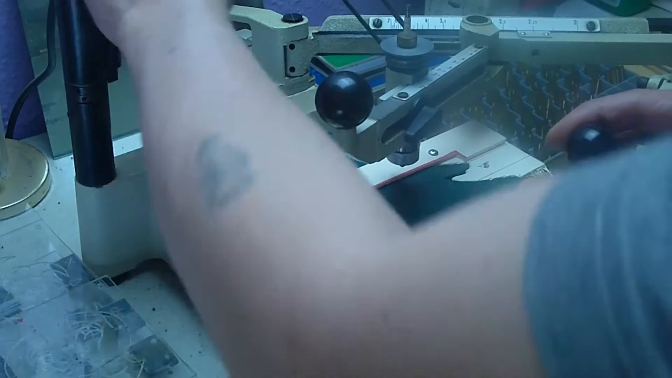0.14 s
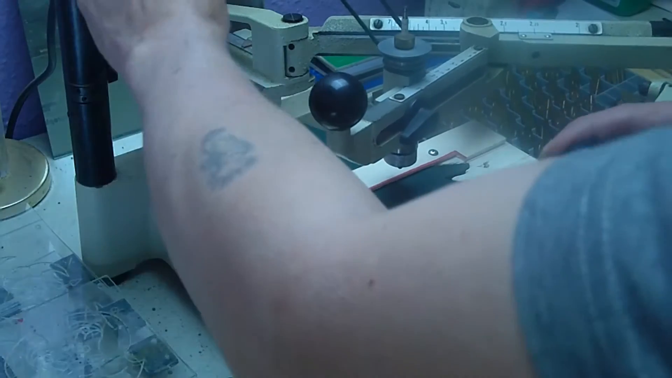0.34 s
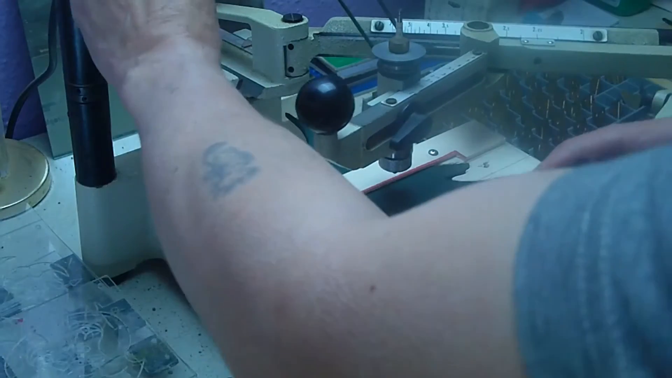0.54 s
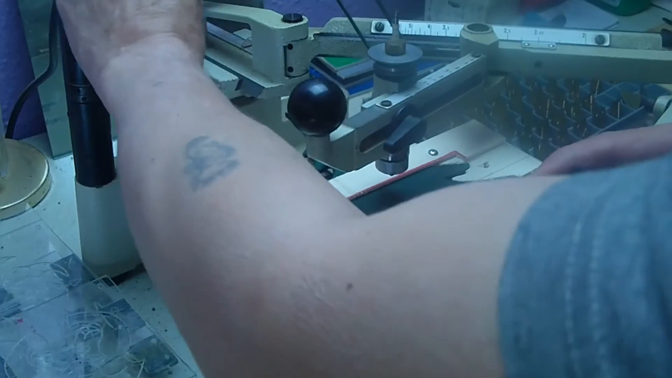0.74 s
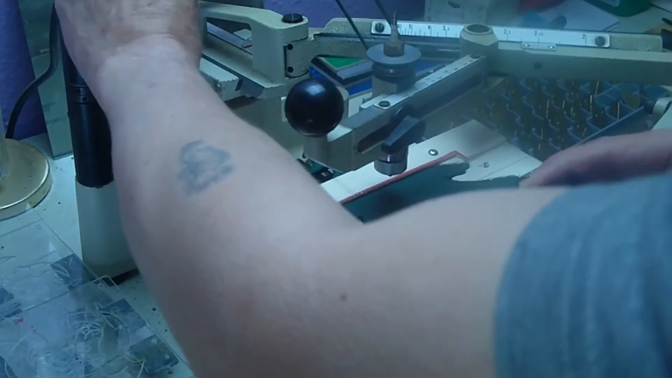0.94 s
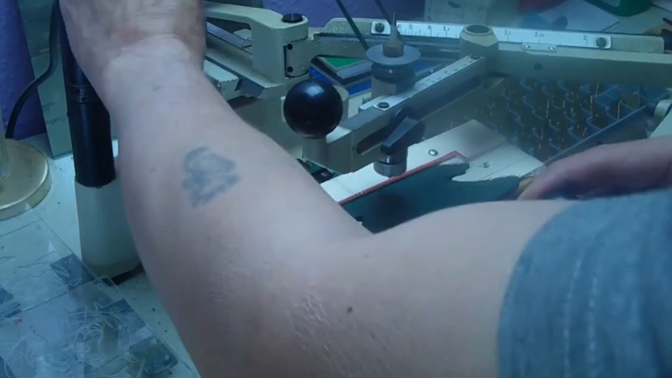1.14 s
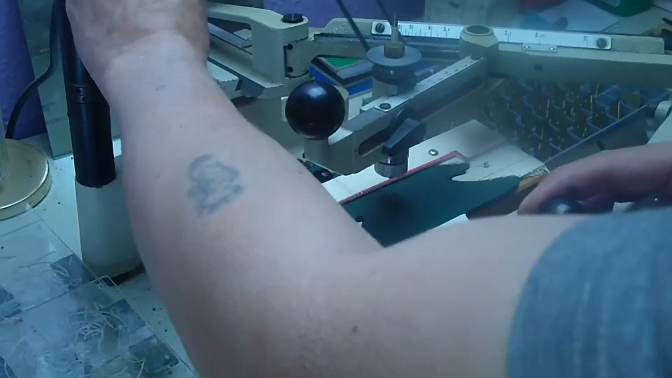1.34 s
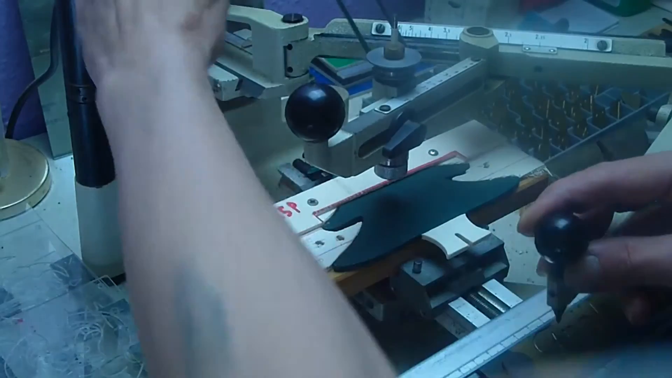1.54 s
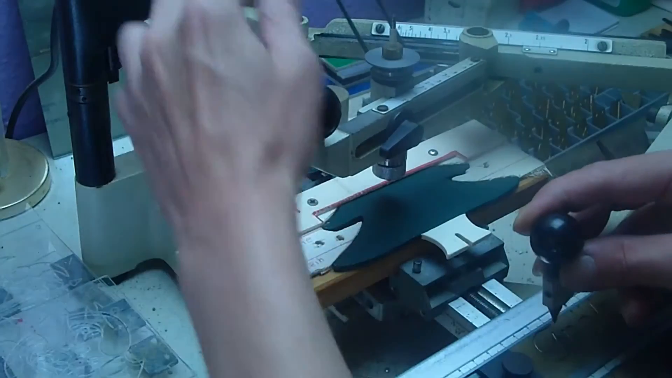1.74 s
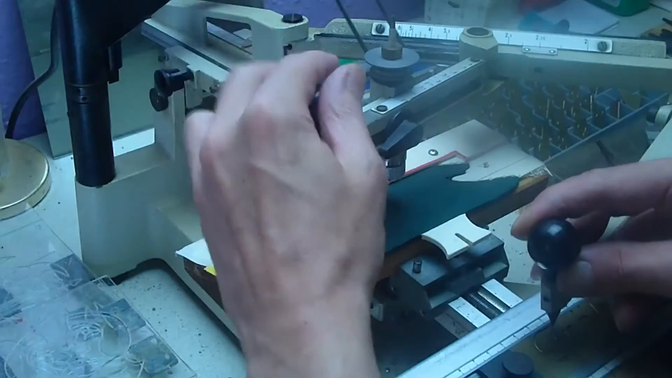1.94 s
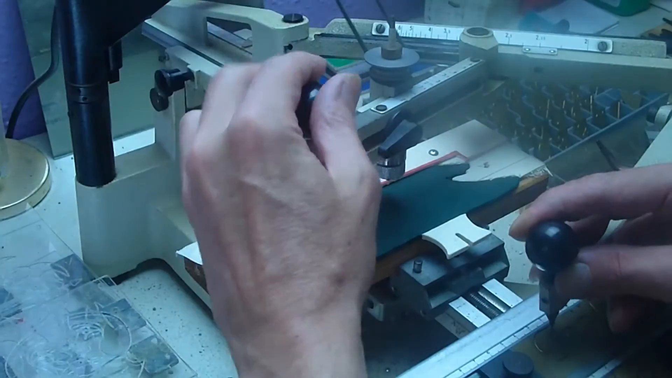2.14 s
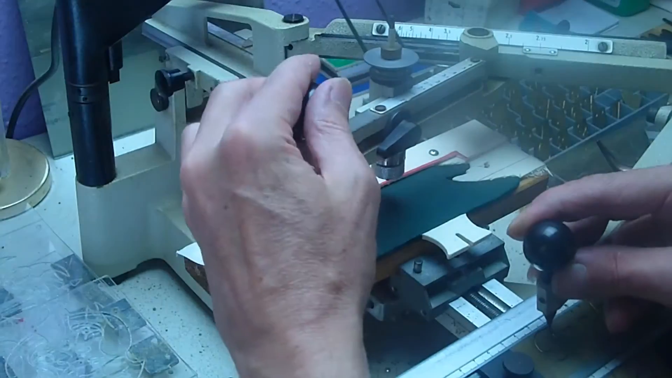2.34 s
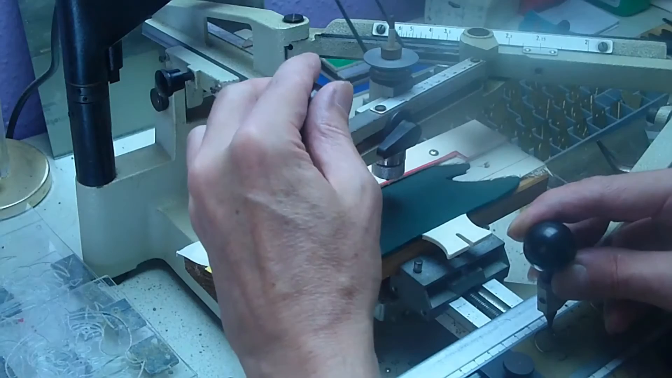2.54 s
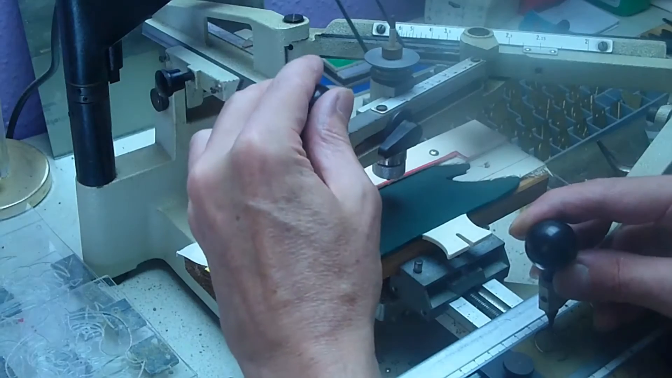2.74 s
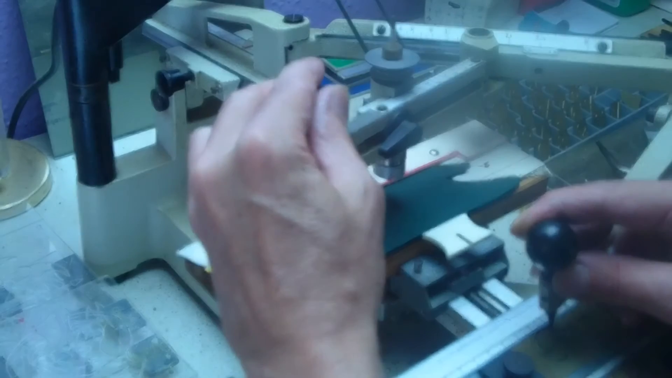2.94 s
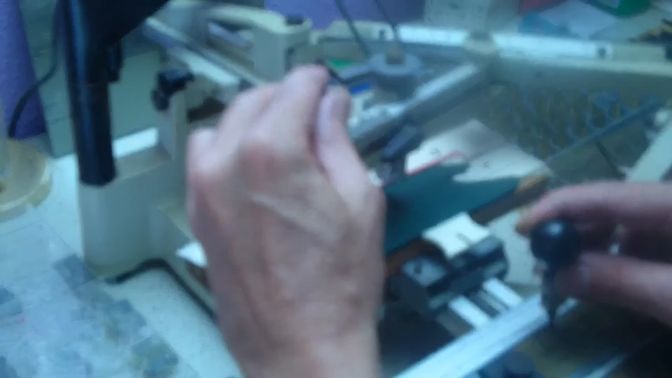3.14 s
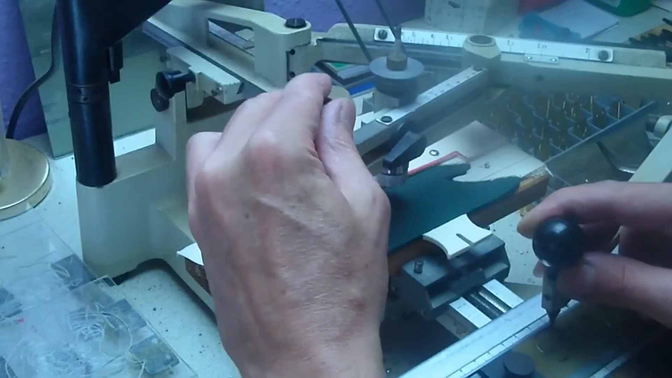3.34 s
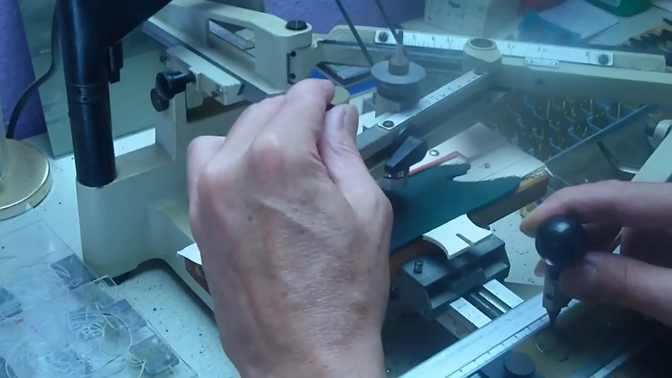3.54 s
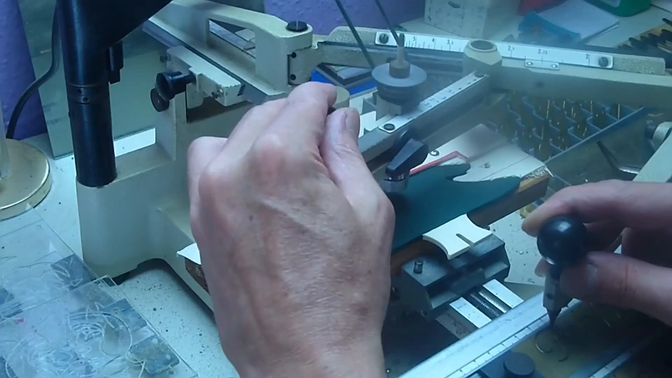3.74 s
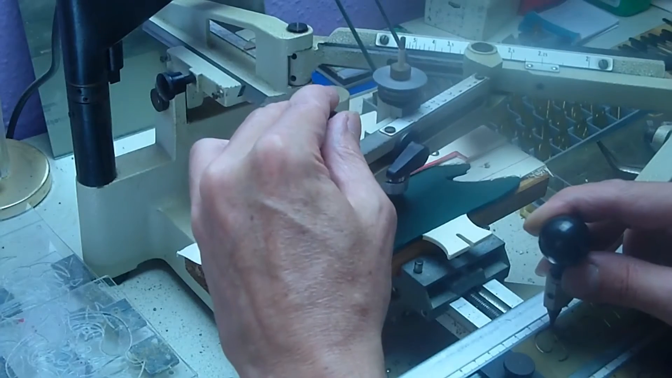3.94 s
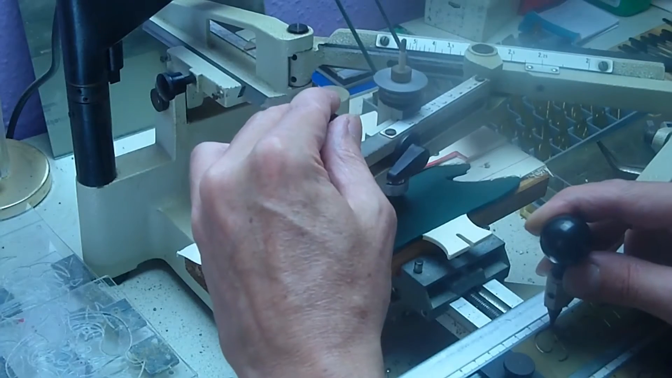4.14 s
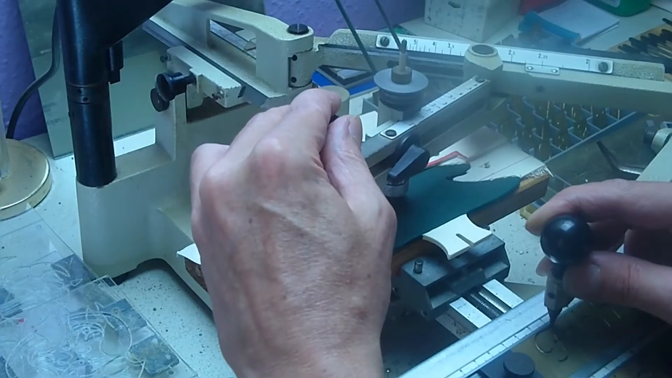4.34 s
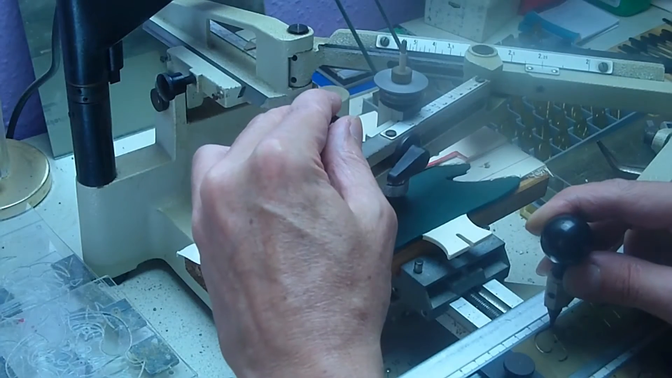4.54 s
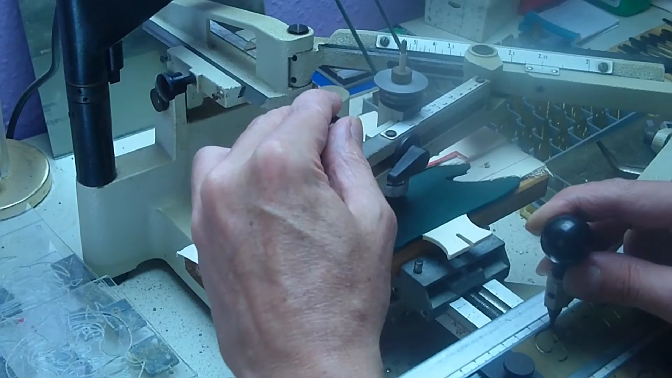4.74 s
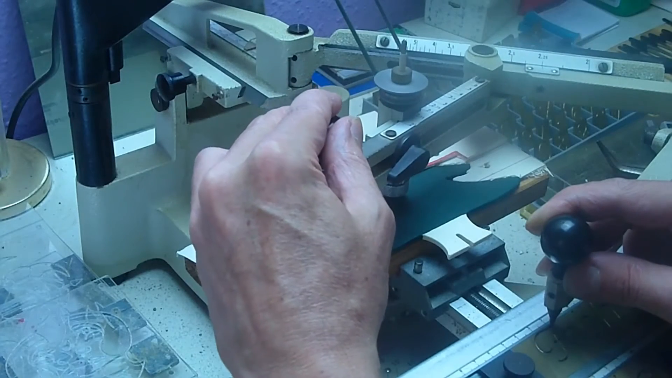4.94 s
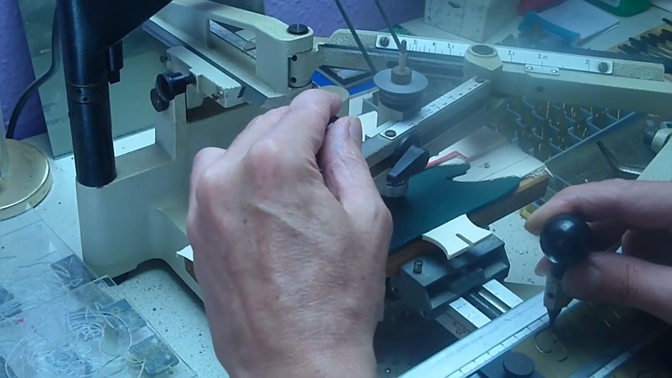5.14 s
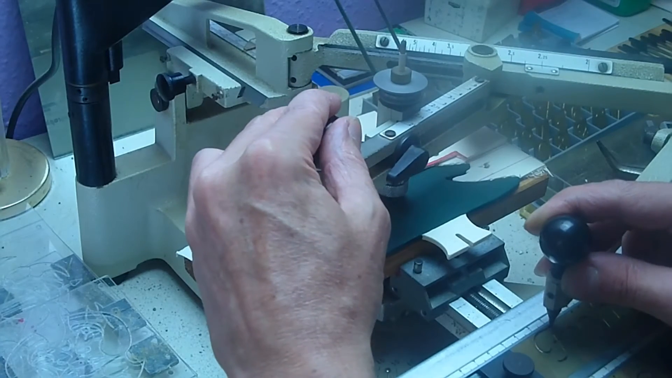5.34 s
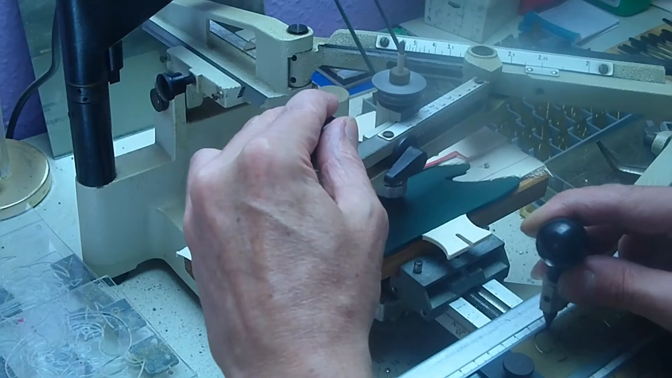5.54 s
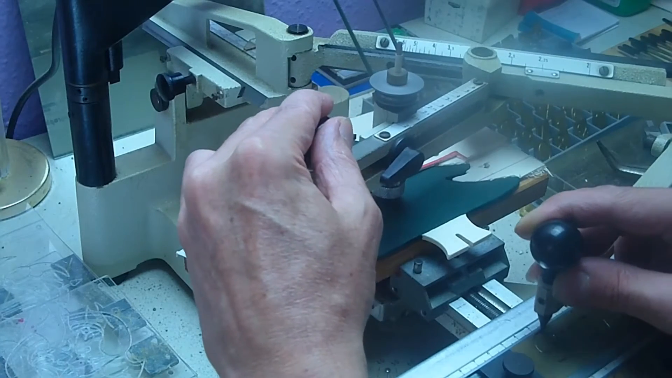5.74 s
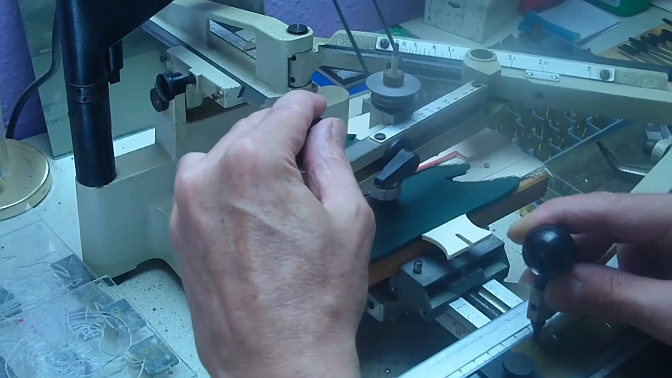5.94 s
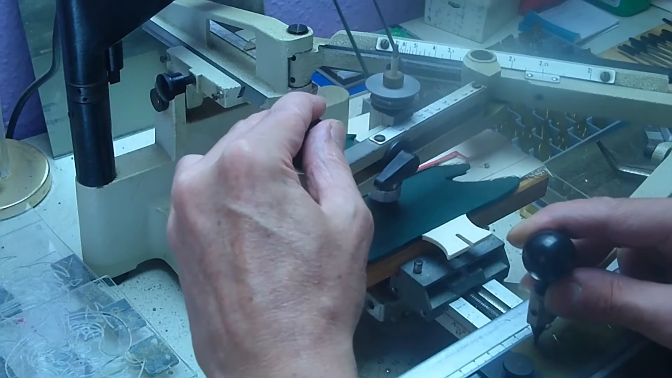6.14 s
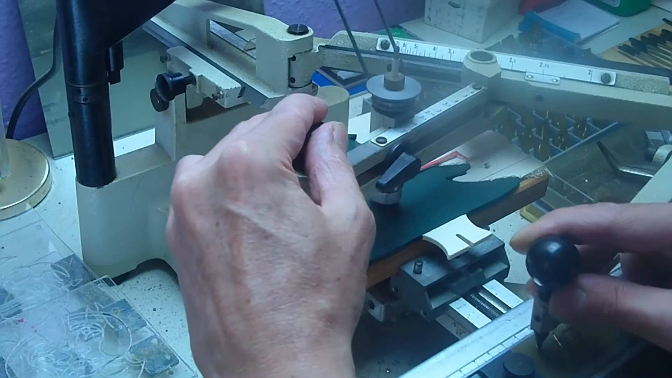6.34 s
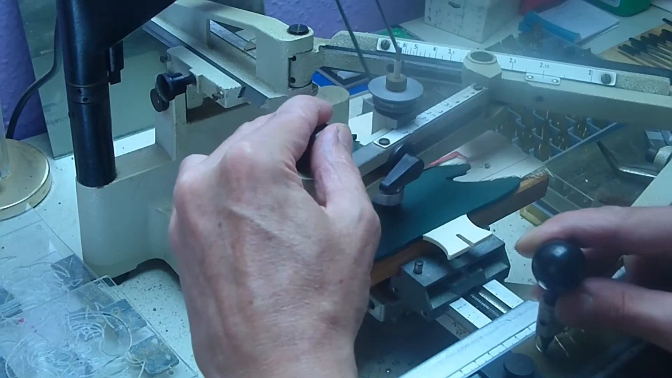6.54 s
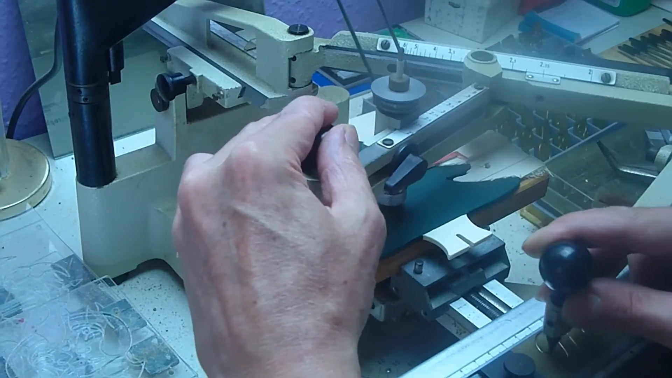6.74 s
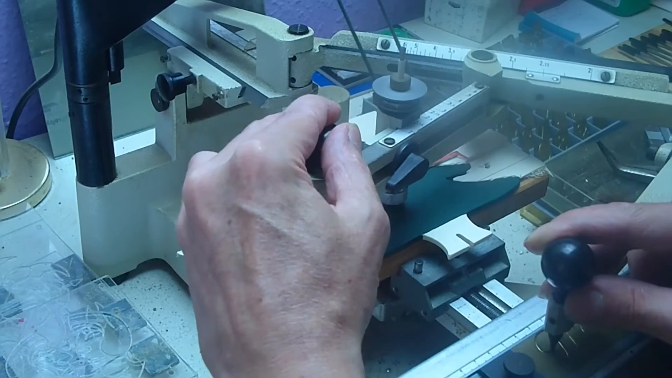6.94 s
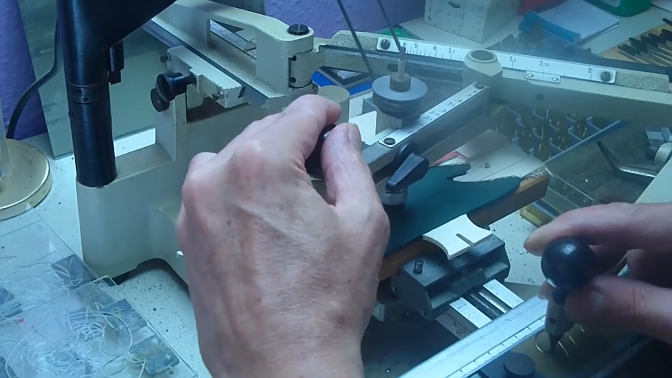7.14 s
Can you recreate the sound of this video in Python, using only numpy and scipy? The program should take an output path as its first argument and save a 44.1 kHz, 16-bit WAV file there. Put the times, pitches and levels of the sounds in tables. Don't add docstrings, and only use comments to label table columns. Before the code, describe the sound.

Quiet workshop hum, finger taps and a sharp switch click; a brushed motor and belt-driven spindle spin up, then whir and chatter harshly in wood.

```python
import sys
import numpy as np
from scipy import signal
from scipy.fft import rfft, irfft, next_fast_len
from scipy.io import wavfile

SR = 44100
rng = np.random.default_rng(int(sys.argv[2]) if len(sys.argv) > 2 else 0)


def persist_wave(psi):
    counts = np.round(np.clip(psi, -1, 1) * 32767).astype(np.int16)
    wavfile.write(sys.argv[1], SR, np.atleast_2d(counts).T)


def amplitude_ratio(level_db):
    exponent = np.asarray(level_db, float) / 20
    return 10 ** exponent


N = 317520
TIME = np.arange(N) / SR
FREQ = np.arange(N // 2 + 1) * SR / N + 1

# f/Hz, width/Hz, level/dB
FRAME = [(718, 92, 11.5), (917, 46, 8), (1200, 56, 4.5), (2406, 76, 8.5), (2700, 164, 9), (2910, 140, 8),
         (4065, 110, 4.5), (4420, 220, 4), (5170, 99, 3.5), (5890, 110, 2), (6550, 170, -1),
         (8060, 300, 3.5), (9350, 380, 4.5)]
# f/Hz, width/Hz, level/dB
BENCH = [(186.4, 4.3, 17), (221.3, 9.1, 25), (236, 23, 21.5), (263, 14, 18.5), (285, 5.8, 8),
         (335, 16.5, 22), (512, 20, 15), (717, 27, 15), (845, 118, 21)]
# f/Hz, width/Hz, level/dB
HOUSING = [(1780, 270, 10.4), (2200, 59, 10), (2350, 48, 23), (2430, 65, 24.6), (2563, 34, 21),
           (2430, 200, 7.6)]


def on_log(table, hz):
    f, value = np.array(table)[:, 0], np.array(table)[:, 1]
    return np.interp(np.log(hz), np.log(f + 1), value)


def rise(start_s, length_s):
    return np.clip((TIME - start_s) / length_s, 0, 1)


def bursts(table):
    return sum(db * np.exp(-(2 * (TIME - s) / length) ** 2) for s, length, db in table)


def noise(gain):
    x = irfft(rfft(rng.standard_normal(N)) * gain, N)
    return x / np.std(x)


def walk(rate_hz):
    steps = TIME[::128]
    hz = np.arange(len(steps) // 2 + 1) / steps[-1]
    x = irfft(rfft(rng.standard_normal(len(steps))) / (1 + (hz / rate_hz) ** 2), len(steps))
    return np.interp(TIME, steps, x / np.std(x))


def ring(s, hz, t60):
    age = np.clip(TIME[int(s * SR):int((s + .3) * SR)] - s, 0, 1)
    return np.sin(2 * np.pi * hz * age) * np.exp(-np.log(1000) * age / t60)


def add(out, s, x):
    start = int(s * SR)
    out[start:start + len(x)] += x


def tone(angle, db, flutter_db):
    level = np.interp(TIME, TIME[::128], amplitude_ratio((db + flutter_db * walk(11.8))[::128]))
    return np.sqrt(2) * level * np.sin(angle + 2 * np.pi * rng.random())


def mains_hum():
    # f/Hz, level/dB
    hum_tones = [(50.2, -35), (147.4, -48), (249, -56), (365, -64), (450, -75), (102, -76), (291, -62),
                 (579, -61), (1174, -74.5), (1798, -82), (3596, -77), (5394, -76)]
    hum = sum(tone(2 * np.pi * hz * TIME, db, flutter_db=min(hz / 300, 1.3)) for hz, db in hum_tones)
    return hum * amplitude_ratio(3.5 * rise(1.13, 0.039))


def room_noise():
    # f/Hz, level/dB (per Hz)
    shop = [(30, -2.5), (70, -17), (120, -11), (300, -17), (600, -22), (1100, -29), (2000, -32.5),
            (4300, -31), (5600, -37), (6500, -44), (9000, -49), (10500, -52), (11500, -80)]
    return amplitude_ratio(-52.5 + 1.2 * walk(9.9)) * noise(amplitude_ratio(on_log(shop, FREQ)))


def camera_drive():
    drive = np.zeros(N)
    soft = np.sin(np.pi / 2 * np.clip(np.arange(800) / 40, 0, 1)) ** 2
    for s in np.arange(.009, 7.17, 1 / 29.97):
        add(drive, s, soft * ring(s, 5000, .011)[:800])
        add(drive, s + .0086, 1.2 * soft * ring(s, 5000, 0.012)[:800])
    return drive + 0.094 * noise(1 / (1 + ((FREQ - 5000) / 250) ** 2))


def switch_ticks():
    # t/s, peak level/dB, dullness (0 to 1)
    ticks = [
        (0.4722, -57, 0.3),
        (0.6015, -40, 0.6),
        (0.621, -45, 0.7),
        (0.9137, -48, 0.5),
        (1.0888, -43, 0.3),
        (1.0944, -45, 0.3),
        (1.1268, -31, 0.3),
        (1.1288, -15, 0),
        (1.148, -27, 0.5),
    ]
    # f/Hz, level/dB, t60/s
    switch_modes = [(2800, -3, 0.028), (3560, 1, 0.029), (3930, -2, 0.052), (4140, 8.5, 0.026),
                    (4630, -17, 0.063), (5400, 9, 0.048), (7612, -27, 0.065), (8700, -25, 0.049)]
    out = np.zeros(N)
    crack_band = signal.butter(5, [1000, 6200], "bandpass", fs=SR)
    age = np.arange(2000) / SR
    crack_shape = (1 - np.exp(-age / 0.0006)) * np.exp(-age / 0.005)
    for s, db, dull in ticks:
        ringing = 0
        for f, mode_db, t60 in switch_modes:
            level_luck, pitch_luck = rng.standard_normal(2)
            level_db = mode_db + 3.3 * level_luck - 32 * dull * np.log2(f / 4000)
            ringing = ringing + amplitude_ratio(level_db) * ring(s, f * (1 + .02 * pitch_luck), min(t60, .025))
        crack = signal.lfilter(*crack_band, rng.standard_normal(len(age))) * crack_shape
        faint = db < -30
        add(out, s, amplitude_ratio(db - 9 - 9 * faint) * ringing)
        add(out, s, amplitude_ratio(db - 0.5 + 3 * faint) * crack)
    return out


def lever_creaks():
    # t/s, level/dB
    creaks = [(.729, -60), (.752, -55), (.787, -55), (.855, -53), (.918, -52), (.957, -54), (.99, -53),
              (1.019, -51), (1.054, -55)]
    out = np.zeros(N)
    for s, db in creaks:
        add(out, s, amplitude_ratio(db) * (ring(s, 2140, 0.027) + 1.2 * ring(s, 980, .04)))
    return out


def bench_thuds():
    # t/s, level/dB, f/Hz, t60/s
    thuds = [(1.131, -28, 111, 0.14), (1.156, -19.5, 122, 0.082), (1.159, -26.5, 255, 0.14),
             (1.311, -18, 144, .1), (1.52, -26, 131, .15), (1.75, -34, 118, 0.26), (1.899, -30, 124.5, .15),
             (2.12, -27, 127, 0.3), (2.2, -28, 63, .2), (2.269, -24, 137, .1), (2.48, -26, 109, 0.092)]
    out = np.zeros(N)
    for s, db, hz, t60 in thuds:
        thud = ring(s, hz, t60)
        push = np.clip(np.arange(len(thud)) / (0.012 * SR), 0, 1)
        add(out, s, amplitude_ratio(db + 3.5) * thud * push)
    return out


def turns(hz):
    return 2 * np.pi * np.cumsum(hz * (1 + .0003 * walk(5.9))) / SR


def frame_gain(hz, modes):
    return 1 + sum((amplitude_ratio(db) - 1) / (1 + (2 * (hz - f) / width) ** 2) for f, width, db in modes)


def low_order(k, hz, angle, db, flutter_db, modes):
    # f/Hz, width/Hz
    nulls = [(191, 2), (203.5, 2), (243, 5), (290, 6), (306, 3), (312, 1.5)]
    slow = k * hz[::256]
    gain = frame_gain(slow, modes) / (1 + (slow / 9350) ** 16)
    for f, width in nulls:
        gain = gain * (1 - 0.96 / (1 + (2 * (slow - f) / width) ** 2))
    return np.interp(TIME, TIME[::256], gain) * tone(k * angle, db, flutter_db)


def fine_orders(table, hz, angle, db):
    slow = hz[::256]
    out = 0
    for k, level in table:
        gain = frame_gain(k * slow, FRAME) / frame_gain(k * slow[-1], FRAME)
        out = out + np.repeat(gain, 256)[:N] * tone(k * angle, level + db, flutter_db=0.97)
    return out


def motor_tones(hz, angle, mains, speed_db, cut, slip, ending):
    # order, level/dB at full speed
    motor_orders = [(18, -49), (20, -48), (21, -36), (22, -41.5), (26, -29), (27, -36.5), (28, -33.5),
                    (33, -40), (34, -41), (36, -51), (38, -50)]
    # order, level/dB
    slot_orders = [(25, -44), (29, -45), (30, -48), (31, -48), (35, -47), (37, -53), (42, -52), (43, -49),
                   (46, -55), (47, -48), (48, -52), (55, -49), (60, -52)]
    # f/Hz, width/Hz, level/dB
    stator = [(5900, 160, 11), (7000, 200, 6), (7760, 300, 10), (8300, 300, 6), (8850, 300, 6),
              (9550, 500, 11)]
    # f/Hz, width/Hz, level/dB
    cap = [(2400, 150, 22), (2750, 170, 23), (2970, 230, 27), (3800, 310, 18), (4055, 77, 28),
           (4483, 110, 26)]
    cut_db = -11 + 11.0 * cut + 1.5 * speed_db
    current_db = 1.2 * slip - .35 * speed_db ** 2
    out = low_order(1, hz, angle, -43 + 1.5 * cut + 0.27 * speed_db, 1.7, BENCH)
    out += low_order(4, hz, angle, -46.5 + 6.5 * speed_db, 2.5, BENCH)
    out += tone(6 * angle, -36 + 5.1 * cut + 2.0 * speed_db, 1.0)
    out += low_order(12, hz, angle, -45 + 1.0 * speed_db + 3.5 * ending, 1.5, HOUSING)
    out += low_order(1, 12 * hz - 100, 12 * angle - mains, -54 - 5.5 * cut, 1.5, HOUSING)
    out += tone(12 * angle + mains, -32.5 + 0.27 * cut_db + 8.3 * speed_db, 1.5)
    out += low_order(24, hz, angle, -52 + 10.5 * cut + 0.83 * speed_db, 1.0, cap)
    for k, db in slot_orders:
        out += low_order(k, hz, angle, db + current_db, 3.5, stator)
    return out + fine_orders(motor_orders, hz, angle, cut_db)


def spindle_tones(hz, angle, speed_db, cut, slip):
    # order, level/dB at full speed
    spindle_orders = [(7, -36), (9, -41.5), (13, -40.5), (14, -37.5), (22, -48), (23, -42), (24, -43),
                      (25, -41.5), (26, -41), (27, -54), (29, -49.5), (31, -49)]
    # t/s, length/s, level/dB
    chatter_5 = [
        (2.45, .15, 10),
        (3.41, 0.11, 5),
        (4.5, 0.24, 8),
        (5.9, .75, 12),
        (6.75, 0.65, 6.5),
    ]
    # t/s, length/s, level/dB
    chatter_6 = [
        (4.42, .3, 15.6),
        (5.5, 0.22, 8.4),
        (6.08, 0.41, 9.1),
        (6.65, 0.31, 5),
    ]
    low = low_order(1, hz, angle, -38.5, 0.93, BENCH)
    low += low_order(2, hz, angle, -47 + 0.83 * cut, 1.0, BENCH)
    low += tone(5 * angle, -44 + 1.9 * speed_db + bursts(chatter_5), 1.0)
    low += low_order(6, hz, angle, -48 + 1.9 * cut + 3.0 * speed_db + bursts(chatter_6), 3.5, HOUSING)
    fine = fine_orders(spindle_orders, hz, angle, .3 - 12 * slip ** 3 + 1.4 * speed_db)
    return rise(1.38, 0.084) * low + fine


def frame_rattle(mains, speed_db):
    # f/Hz, level/dB (per Hz)
    rattle = [(40, -36), (90, -4.5), (130, -4.5), (250, -7.5), (450, 2), (700, -6.5), (1100, 0.5),
              (1600, -1), (2200, -6.5), (4000, -50)]
    level = amplitude_ratio(-25.5 + 2.43 * speed_db + 1.25 * walk(11))
    hiss = noise(frame_gain(FREQ, FRAME) * amplitude_ratio(on_log(rattle, FREQ)))
    return level * hiss * (1 + 0.082 * np.cos(mains))


def cover_ring():
    # t/s, length/s, level/dB
    shakes = [
        (1.24, 0.027, 5),
        (1.7, .15, 0.5),
        (2.3, 0.19, 3.5),
        (2.86, 0.89, 6.5),
        (4.2, 0.39, 4),
        (5.25, 0.42, 2.5),
        (7.13, 0.087, 0),
    ]
    ringing = noise(1 / (1 + (2 * (FREQ - 829.5) / 60) ** 2))
    return amplitude_ratio(-33.0 + bursts(shakes) + 0.85 * walk(14)) * ringing


def brush_hiss(motor, mains, speed_db, cut):
    # f/Hz, level/dB (per Hz)
    brush = [(600, -21), (1500, -17), (2000, -2.5), (3000, -2.5), (3700, -1.5), (4600, 0.5), (5600, 0.5),
             (6400, -0.5), (7500, -20), (12000, -39)]
    sparks = 1 + 0.15 * np.cos(2 * motor) + 0.086 * np.cos(motor) + 0.063 * np.cos(mains)
    level = amplitude_ratio(-24.0 + 1.27 * cut + 0.78 * speed_db + 0.87 * walk(17))
    return level * noise(frame_gain(FREQ, FRAME) * amplitude_ratio(on_log(brush, FREQ))) * sparks


def bearing_hiss(spindle, speed_db, slip, ending):
    # f/Hz, level/dB (per Hz)
    bearing = [(4000, -44), (6000, -1), (7000, 0), (8500, -3.5), (9600, -3.5), (10300, -6.5), (11200, -11),
               (12500, -22), (13800, -31), (15000, -59)]
    balls = 1 + 0.22 * np.cos(spindle) + 0.16 * np.cos(2 * spindle)
    level = amplitude_ratio(-30.5 + 1.17 * slip + 1.3 * speed_db - 3.9 * ending ** 3 + 0.24 * walk(19.0))
    return level * noise(frame_gain(FREQ, FRAME) * amplitude_ratio(on_log(bearing, FREQ))) * balls


def machine():
    # t/s, motor turns f/Hz
    speed = [(1.14, 59.7), (1.21, 71), (1.31, 99.6), (1.43, 126.3), (1.55, 144.6), (1.72, 162.8),
             (1.86, 173), (2.06, 184), (2.31, 193.1), (2.61, 200.6), (2.93, 205.4), (3.25, 207.9),
             (3.73, 209.3), (4.3, 210.4), (5.4, 211.7), (6.2, 211.5), (6.95, 211.9), (7.2, 213.2)]
    # t/s, depth (0 to about 1)
    depth = [
        (2.6, 0),
        (3.2, 0),
        (4.15, 0.55),
        (4.4, .9),
        (5.2, 0.99),
        (6, 1.05),
        (6.9, 1.05),
        (7.2, 1),
    ]
    motor_hz = np.interp(TIME, *np.transpose(speed))
    cut = np.interp(TIME, *np.transpose(depth))
    slip = 1 / (1 + np.exp((TIME - 3.39) / .27))
    belt_ratio = 1.567
    spindle_hz = belt_ratio * motor_hz * (1 - .0147 * slip)
    speed_db = 20 * np.log10(motor_hz / 211.5)
    ending = rise(6.24, 0.77)
    motor, spindle = turns(motor_hz), turns(spindle_hz)
    mains = 2 * np.pi * 100 * TIME
    out = motor_tones(motor_hz, motor, mains, speed_db, cut, slip, ending)
    out += spindle_tones(spindle_hz, spindle, speed_db, cut, slip)
    out += frame_rattle(mains, speed_db) + cover_ring()
    out += brush_hiss(motor, mains, speed_db, cut)
    out += bearing_hiss(spindle, speed_db, slip, ending)
    return out * rise(1.132, .03)


def two_ports(sound):
    # f/Hz, level/dB, phase/rad
    port_table = [(45, 1.7, -0.29), (199, -1.06, -0.038), (1200, 0, 0.094), (2700, -0.4, -0.035),
                  (4560, 1, 0.41), (5100, 3.5, -0.44), (6170, -2, -0.52), (7240, -4.5, -0.84),
                  (8500, -5.5, -0.56), (9800, -3.5, 0), (11800, -1, 0.068), (12300, -11, 0),
                  (13300, -32, 0), (13800, -5, -0.059), (14600, -29, 0)]
    # f/Hz, level/dB
    diffuse_share = [(30, -32), (200, -22.5), (1000, -36), (2500, -20), (5000, -14), (9000, -13.5),
                     (13000, -5)]
    size = next_fast_len(N + 65536)
    hz = np.arange(size // 2 + 1) * SR / size + 1
    ports = np.array(port_table)
    direct = rfft(sound, size)
    tail = rng.standard_normal(8000) * np.exp(-np.arange(8000) / 1600)
    diffuse = np.exp(1j * np.angle(rfft(tail, size))) * amplitude_ratio(on_log(diffuse_share, hz))
    port = amplitude_ratio(on_log(ports, hz) / 2) * np.exp(.5j * on_log(ports[:, ::2], hz))
    left = irfft(direct * port * (1 + diffuse), size)[:N]
    right = irfft(direct / port * (1 - diffuse), size)[:N]
    return np.array([left, right])


def scene():
    workshop = mains_hum() + room_noise()
    knocks = switch_ticks() + lever_creaks() + bench_thuds()
    return two_ports(workshop + knocks + machine())


def top_cut(x):
    return signal.sosfilt(signal.butter(12, 14840, fs=SR, output="sos"), x)


def record(dry):
    # f/Hz, width/Hz
    notches = [(1400, 178), (3300, 487), (4900, 455), (6540, 930)]
    x = signal.sosfilt(signal.butter(4, 12500, fs=SR, output="sos"), dry)
    for hz, width in notches:
        x = signal.lfilter(*signal.iirnotch(hz, hz / width, SR), x)
    leak = camera_drive() * amplitude_ratio(np.array([[-49], [-57]]))
    mix = x + leak + 0.0049
    return top_cut(mix)


dry = scene()
out = record(dry)
persist_wave(out)
```